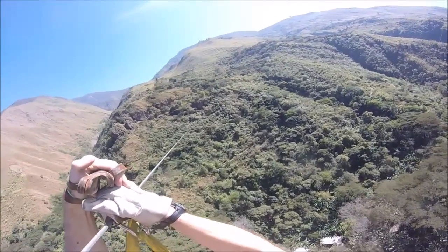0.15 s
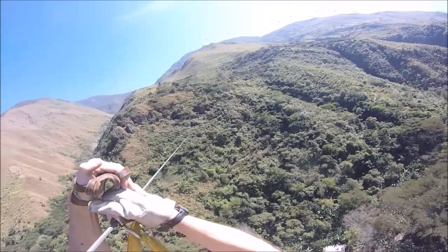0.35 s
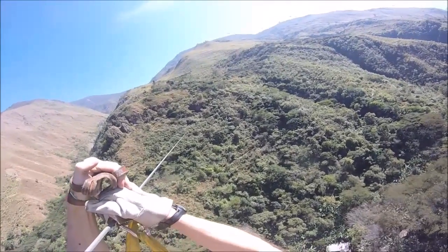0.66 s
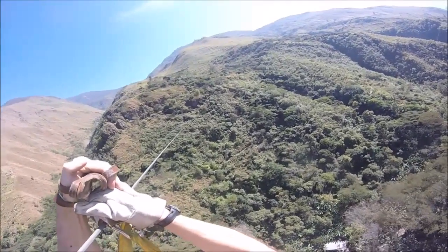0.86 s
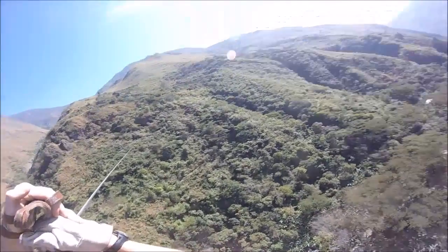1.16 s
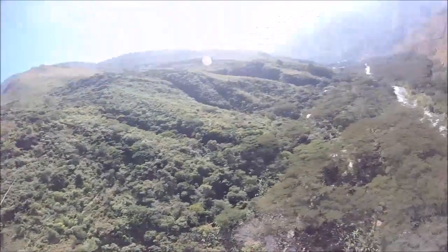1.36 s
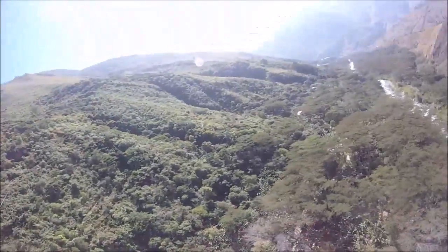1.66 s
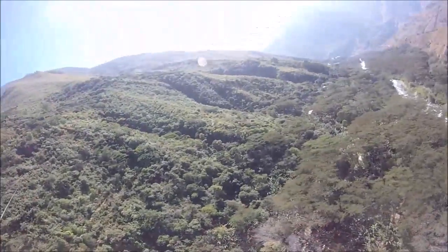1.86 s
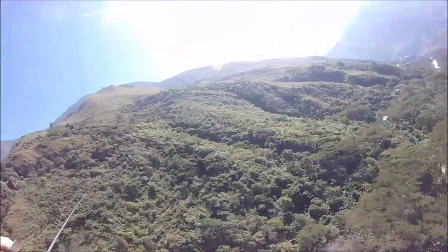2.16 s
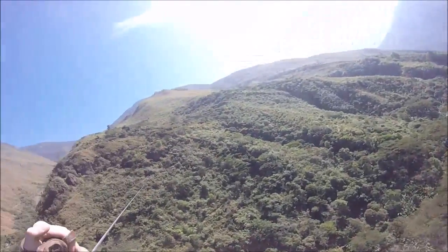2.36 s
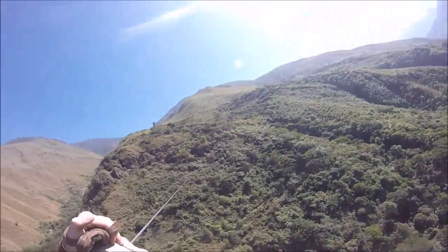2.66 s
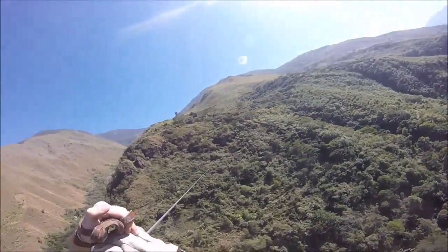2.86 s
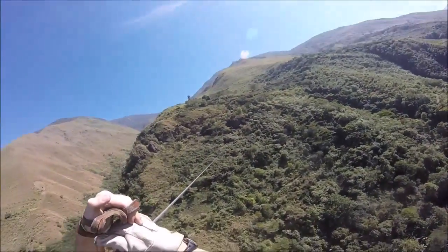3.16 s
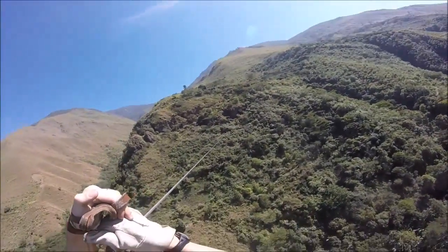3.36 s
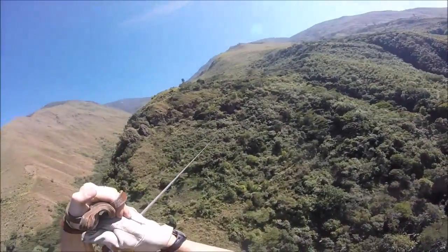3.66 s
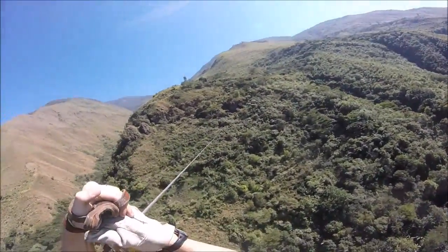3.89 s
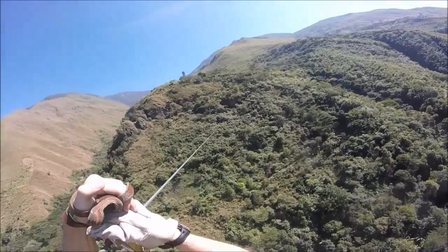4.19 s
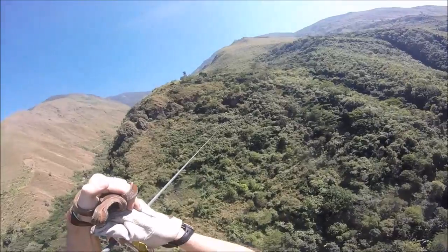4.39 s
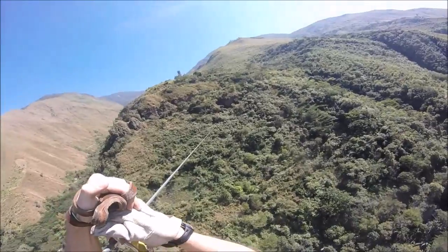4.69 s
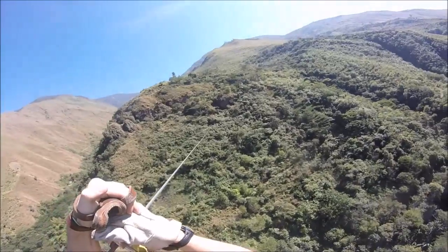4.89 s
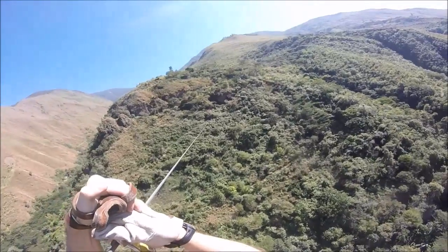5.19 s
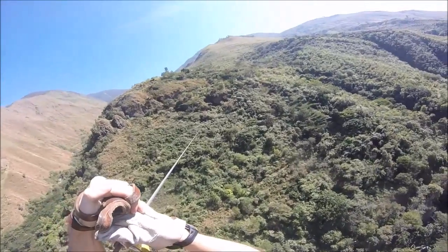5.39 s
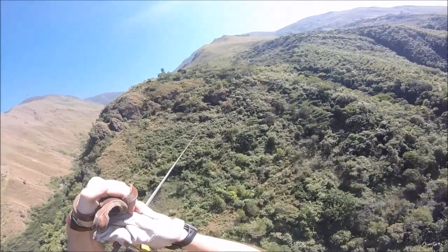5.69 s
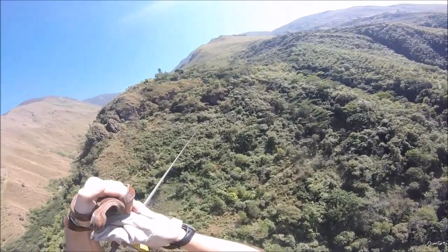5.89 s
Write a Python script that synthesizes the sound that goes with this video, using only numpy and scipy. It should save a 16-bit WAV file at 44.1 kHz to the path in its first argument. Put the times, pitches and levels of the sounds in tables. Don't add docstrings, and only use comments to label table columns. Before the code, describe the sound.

Close outdoor helmet-microphone sound of a zip-line trolley rolling on stranded steel cable. A bright, nasal whine with strong overtones runs throughout, wavering slightly and sliding down around two semitones as the ride slows. Rough metallic hiss and faint buzzing side tones surround it, while low wind rumbles and buffets underneath. A brief soft hoot of air comes just after one second.

```python
import sys
import numpy as np
from scipy import signal
from scipy.fft import rfft, irfft
from scipy.io import wavfile
from scipy.ndimage import uniform_filter1d, map_coordinates

SR = 44100
rng = np.random.default_rng(int(sys.argv[2]) if len(sys.argv) > 2 else 0)


def convert_level_to_amplitude(level_db):
    exponent = np.asarray(level_db, float) / 20
    return 10 ** exponent


def pcm_store(signal):
    levels = np.round(np.clip(np.atleast_2d(signal), -1, 1) * 32767)
    wavfile.write(sys.argv[1], SR, levels.astype(np.int16).T)


N = 266364
T = np.arange(N) / SR
STRANDS = 6
HOP = 512
START_HZ, SLOWED_HZ = 1085.2, 965


def slowed(s):
    loss_hz = 11.65 * s + 1.443 * s ** 2
    return loss_hz / (START_HZ - SLOWED_HZ)


def strand_rate():
    # t/s, change of strand rate f/Hz, length/s
    lay = [(0.21, 9.0, 0.08), (0.39, 4.1, 0.07), (0.79, -5.2, 0.14), (1.04, -7.4, 0.06), (1.34, 5.0, 0.1),
           (1.58, -8.5, 0.36), (1.75, 9.9, 0.2), (2.01, -8.4, 0.11), (2.31, 10.3, 0.11), (2.45, -6.5, 0.14),
           (2.78, 12.3, 0.06), (2.81, -10.5, 0.11), (3.08, 7.5, 0.09), (3.48, 11.2, 0.09),
           (3.62, 14.0, 0.14), (3.64, -10.6, 0.4), (3.83, 11.4, 0.1), (4.15, -10.7, 0.07),
           (4.32, -8.8, 0.09), (4.57, -9.9, 0.35), (4.68, 7.9, 0.06), (4.83, 2.7, 0.12),
           (4.94, -12.3, 0.12), (5.12, -14.0, 0.15), (5.15, -2.7, 0.1), (5.41, 9.0, 0.07), (5.6, 9.4, 0.07),
           (5.67, -13.0, 0.4)]
    rocking = 1.3 * wobble(14)
    return START_HZ - (START_HZ - SLOWED_HZ) * slowed(T) + bumps(lay) + rocking


def whine(turns):
    # t/s, level/dB
    fundamental = [(0, -34), (.15, -33.5), (.45, -35), (1.1, -34.5), (1.4, -39.5), (1.75, -44.5),
                   (2.7, -47.5), (3.3, -41.5), (3.75, -40), (4.45, -40), (4.8, -39), (5.05, -41.5),
                   (5.4, -41), (5.65, -44.5), (6.04, -46)]
    levels = curves(fundamental) + overtones()
    slip = .011 * wobble(60) + .006 * wobble(220)
    out = 0
    for number, db in enumerate(levels, 1):
        size = convert_level_to_amplitude(db) * (1 + 0.069 * np.sqrt(number) * wobble(90))
        phase = 2 * np.pi * number * (turns + slip) + 2 * np.pi * rng.random()
        out = out + np.sqrt(2) * size * np.sin(phase)
    out_of_round = 1 + 0.013 * np.cos(2 * np.pi * .0975 * turns)
    return out * out_of_round


def overtones():
    # start t/s, length/s, level/dB
    swells = [
        [(0, 1.38, -35), (.55, 0.43, -34.5), (1.5, .15, -36), (1.73, 0.11, -35), (1.93, .13, -36),
         (2.75, 0.73, -35), (4.3, .65, -39), (4.9, 0.09, -36), (5.05, 0.14, -35), (5.25, 0.15, -39),
         (5.45, .13, -38)],
        [(0, 2.38, -31), (.2, .95, -29), (.7, 0.2, -30), (2.4, 0.67, -36.5), (3.55, 0.56, -40),
         (4.05, 0.56, -34), (5.0, .5, -36), (5.6, .3, -40)],
        [(2.35, 0.86, -45), (3.48, 0.22, -33.5), (3.75, 0.24, -34), (4.03, 0.51, -33.5), (4.6, 0.13, -36),
         (5.2, 0.24, -41.5)],
    ]
    shrill = [
        [(0, 1.25, -50), (3.3, 0.15, -51), (4.3, .4, -54), (4.85, .15, -51), (5.4, .3, -56)],
        [(.2, 0.48, -39.5), (.7, 0.834, -36.5), (2.2, 0.32, -42), (2.75, 0.95, -44), (3.35, .2, -40),
         (4.35, 0.63, -40), (5.5, .5, -45)],
        [(0, 1.3, -39), (1.75, .6, -43), (3.7, .3, -46), (4, .3, -40.5), (4.68, 0.25, -37), (4.95, .6, -47)],
    ]
    rest_levels = [-45.5, -45, -46, -55.5, -53.5, -52]
    t = np.arange(0, N + HOP, HOP) / SR
    levels = []
    for rest_db, rows in zip(rest_levels, swells + shrill):
        power = convert_level_to_amplitude(rest_db) ** 2
        power = power + sum(convert_level_to_amplitude(db) ** 2 * held(t, s, length) for s, length, db in rows)
        rocking_db = .9 * wobble(8)
        levels.append(np.interp(T, t, 10 * np.log10(power)) + rocking_db)
    return levels


def twist(turns, hz, loud):
    # multiple of the twist rate, level/dB over the rolling noise in 1 Hz, gain once slowed/dB
    lines = [(7, 19, 3.5), (8, 20, 1), (9, 11.5, 2.5), (10, 13, 16), (11, 20, -6), (13, 18.5, -2),
             (14, 21, -11), (15, 16.5, -1), (16, 15, 4), (17, 12.5, 9), (19, 5, -5), (20, 16, 3),
             (21, 15, 7), (25, 15.5, 4.5), (26, 24.5, -4), (29, 14, 0), (30, 27, -4), (31, 9, 1),
             (32, 11, -6), (35, 13.5, 11), (38, 18, -4), (39, 25, -7), (41, 12, -39), (44, 24.5, -4),
             (45, 30, -11), (47, 25, -10), (48, 28.5, -10), (50, 22, -6), (54, 20.5, 4)]
    fine = (33, 34, 37, 40, 43, 46, 49, 51, 52, 53, 55, 56, 57, 58, 59, 60, 62)
    proud_lines = (9, 29, 48, 8, 13, 20, 48, 11, 11, 48, 8, 7, 20, 13, 54, 25)
    # start t/s, length/s, gain/dB
    proud = [(0, .78, 19), (.1, 1.9, 5), (1.2, .8, -4), (1.54, 2.02, 2.5), (2.16, 1.1, 8), (2.64, .4, 8),
             (3.1, 0.56, 6), (3.44, 0.8, 7.5), (4.16, .9, 8), (4.44, .6, 7), (4.56, .9, 5.5),
             (4.89, 0.66, 7.5), (4.96, 0.68, 6.5), (5.5, 1.0, 12), (4.34, .5, 0), (5, 0.54, 5)]
    knots = np.arange(0, N, HOP)
    s = knots / SR
    out = 0
    for number, db, slow_db in lines + [(multiple, 19.5, 0) for multiple in fine]:
        if number == 5 * STRANDS:
            continue
        drift_db = 1.6 * unit(uniform_filter1d(rng.standard_normal(len(knots)), size=8))
        proud_db = sum(gain_db * held(s, start, length)
                       for line, (start, length, gain_db) in zip(proud_lines, proud) if line == number)
        level_db = db + slow_db * slowed(s) + 2.0 + drift_db + proud_db
        size = frame(number * hz[knots] / STRANDS, s) * convert_level_to_amplitude(level_db)
        tone = np.sin(2 * np.pi * (number * turns / STRANDS + rng.random()))
        out = out + np.interp(np.arange(N), knots, size) * tone
    wheel_turn = 1 + 0.054 * np.cos(2 * np.pi * 0.13 * turns)
    return out * loud * wheel_turn


def rolling(turns, loud):
    twists = 2 * np.pi * turns / STRANDS
    throb = 1 + .08 * np.cos(twists) + .1 * np.cos(2 * twists)
    return noise(frame, patchy_db=1.0, size=1024) * throb * loud * convert_level_to_amplitude(0.42 * wobble(8))


def frame(hz, s):
    # f/Hz, width/Hz, level/dB per Hz, gain with head turned/dB, gain once slowed/dB
    frame_modes = [(1164, 167, -78.5, 1, -1.5), (1426, 260, -68, .5, -6), (2007, 550, -71, -0.5, -3),
                   (2373, 286, -61.5, 1, -9), (2434, 56, -63, -4, 3), (2628, 52, -60.5, -4, -1.5),
                   (3265, 29, -67, 7, -3.5), (2713, 287, -64.5, 1.5, -3.5), (3274, 560, -65.5, -1.5, -4),
                   (4038, 340, -68, -3, -1.5), (4510, 570, -77, 2.5, -2.5), (5210, 500, -76, -3, -12.5)]
    wheel_modes = [(6020, 545, -68, 0.5, -9), (6434, 400, -66, 2, -10.5), (7010, 290, -70.5, -5, -2),
                   (7850, 820, -72, -3, -6), (8880, 630, -70, -4, -4.5), (9290, 490, -76.5, 0, 4.5),
                   (10040, 650, -81, -1.5, -1.5), (10830, 650, -81, -1, -1.5), (11920, 750, -83, -4, -6),
                   (12500, 790, -84, -0.5, -5), (13716, 1010, -92, 2, 0), (14800, 870, -93.5, 4, -6)]
    # f/Hz, width/Hz, share removed
    notches = [(3750, 150, 0.53), (2247, 75, 0.64), (8330, 220, 0.54)]
    # t/s, head turned (0-1)
    head = [(0, 0.1), (1.1, 0), (1.45, 0.7), (2, 1), (2.4, 1), (2.95, 0.6), (3.4, 0.01), (5.4, 0.01),
            (6.04, 0.07)]
    # t/s, length/s, f/Hz, width/Hz, level/dB
    limbs = [(.6, 1.4, 13600, 1300, -4), (1, 0.44, 6420, 500, 3), (2.0, 1.5, 8500, 660, -8),
             (2.5, 1.2, 11400, 500, 2.5), (2.75, 0.55, 7300, 1000, -6), (3.1, .8, 13900, 1800, -6),
             (3, 0.77, 4500, 760, -2), (2.7, 0.74, 1900, 460, -2), (3.8, 1.8, 10700, 1200, 6),
             (4.2, 1.8, 1870, 530, 3), (3.8, 1.5, 12800, 1600, 2.5), (5.45, 0.93, 3400, 600, 0.5),
             (1.9, 1.2, 13300, 900, 2), (1.95, 1.2, 1720, 350, -2), (2.65, .4, 1970, 440, -1),
             (4.8, 2.5, 15000, 900, -3)]
    turned, slow = np.interp(s, *np.transpose(head)), slowed(s)
    power = 0
    for centre, width, db, turned_db, slow_db in frame_modes + wheel_modes:
        if 10000 < centre < 12300:
            centre = centre * (1 - .03 * turned)
        peak = convert_level_to_amplitude(db + turned_db * turned + slow_db * slow) ** 2
        power = power + peak / (1 + (2 * (hz - centre) / width) ** 6)
    for centre, width, share in notches:
        power = power * (1 - share / (1 + (2 * (hz - centre) / width) ** 2)) ** 2
    passing_db = 0
    for at, length, centre, width, db in limbs:
        distance = (2 * (s - at) / length) ** 2 + (2 * (hz - centre) / width) ** 2
        passing_db = passing_db + db * np.exp(-distance)
    return np.sqrt(power) * convert_level_to_amplitude(passing_db)


def air():
    # f/Hz, level/dB per Hz
    rumble = [(12, -12.5), (25, -1.5), (55, -5.5), (85, -3), (104, 1), (118, -1.5), (135, -5.5),
              (200, -10.5), (290, -17), (560, -19.5), (760, -26), (930, -24), (1300, -39), (2500, -120)]
    # t/s, level/dB over the steady air, length/s
    gusts = [(.23, 2.9, .12), (.46, 3, 0.091), (.7, 1.5, 0.33), (1.14, 2.8, 0.056), (1.88, 1.5, 0.4),
             (3.55, 1.8, 0.09), (3.9, 1.87, 0.16), (5.62, 0.92, .2)]
    # t/s, f/Hz, level/dB, length/s
    puffs = [
        (1.14, 186.7, -38.5, 0.055),
        (1.186, 218, -42, 0.079),
    ]
    f, spectrum_db = np.transpose(rumble)

    def colour(hz, s):
        return convert_level_to_amplitude(np.interp(np.log(hz + 1), np.log(f), spectrum_db))

    hoot = 0
    for s, hz, db, length in puffs:
        hoot = hoot + convert_level_to_amplitude(db) * np.exp(-(2 * (T - s) / length) ** 2) * np.sin(2 * np.pi * hz * T)
    level_db = -41 + bumps(gusts) + 1.1 * wobble(9)
    return unit(noise(colour, patchy_db=1.5, size=4096)) * convert_level_to_amplitude(level_db) + hoot


def noise(gain, patchy_db, size):
    hz, s, z = signal.stft(rng.standard_normal(N), SR, nperseg=size)
    field = uniform_filter1d(rng.standard_normal(z.shape), size=3, axis=0)
    field = uniform_filter1d(field, size=5, axis=1)
    z = z * gain(hz[:, None], s) * convert_level_to_amplitude(patchy_db * unit(field)) * np.sqrt(SR / 2)
    return signal.istft(z, SR, nperseg=size)[1][:N]


def unit(x):
    return x / np.sqrt(np.mean(np.abs(x) ** 2) + 1e-20)


def curves(rows):
    s, *cols = np.transpose(rows)
    return [np.interp(T, s, c) for c in cols]


def wobble(rate):
    return map_coordinates(rng.standard_normal(int(N * rate / SR) + 4), [np.arange(N) * rate / SR])


def held(t, s, length):
    edge_s = .055
    rise = np.tanh((t - s) / edge_s) if s > 0 else 1
    return (rise - np.tanh((t - s - length) / edge_s)) / 2


def bumps(rows):
    return sum(height * np.exp(-(2 * (T - s) / length) ** 2) for s, height, length in rows)


def scene():
    # t/s, level/dB
    contact = [(0, 0.5), (.3, 2), (.9, 1.5), (1.2, 1.5), (1.7, 0.5), (2.2, 0.5), (2.6, 0), (3.4, 0.5),
               (3.8, -0.5), (4.6, 1.5), (5, 2), (5.4, 2), (5.7, 2.5), (6.04, 1.5)]
    hz = strand_rate()
    turns = np.cumsum(hz + .9 * wobble(18)) / SR
    loud = convert_level_to_amplitude(curves(contact)[0])
    return (whine(turns) + twist(turns, hz, loud) + rolling(turns, loud) + air())[None]


def starve(x):
    # t/s, level/dB under which a frequency is lost, length/s
    starved = [(.313, -32, .026), (.483, -33, .022), (.548, -33, .022), (.624, -28, .06), (.677, -33, .024),
               (.931, -33, .026), (1.017, -32, .024), (1.136, -27, .06), (1.338, -33, .024),
               (2.147, -37, .028), (2.408, -38, .026), (3.453, -36, .022), (3.512, -35, .028),
               (4.406, -36, .027), (4.921, -35, .027), (5.498, -35, .026), (5.688, -36, .024)]
    out = x.copy()
    for s, db, length in starved:
        half = round(length * SR / 2)
        part = slice(round(s * SR) - half, round(s * SR) + half)
        window = np.sqrt(signal.windows.tukey(2 * half, .8))
        z = rfft(x[part] * window)
        size = np.abs(z) / np.sqrt(half * 1000) + 1e-9
        around = np.exp(uniform_filter1d(np.log(size), size=half // 8))
        prominence = size / around ** .35 / convert_level_to_amplitude(db)
        lost = z / (1 + prominence ** 6)
        out[part] -= window * irfft(lost, 2 * half)
    return out


def low_pass(x):
    return signal.sosfilt(signal.butter(12, 15210, fs=SR, output="sos"), x)


def record(dry):
    mix = starve(dry[0])[None]
    return low_pass(mix)


dry = scene()
out = record(dry)
pcm_store(out)
```